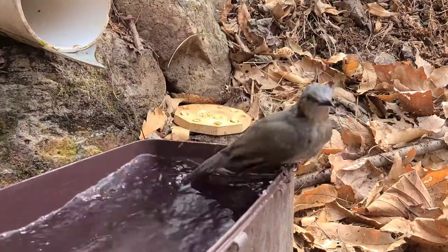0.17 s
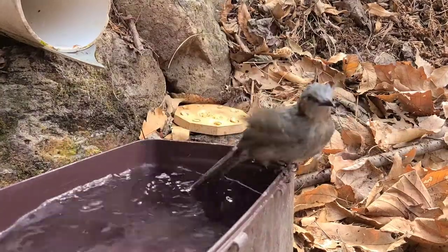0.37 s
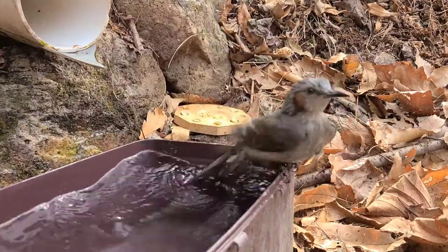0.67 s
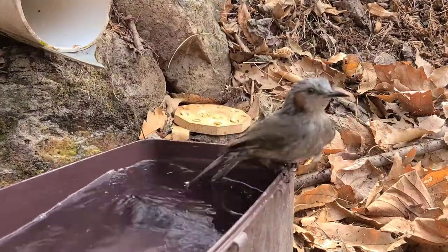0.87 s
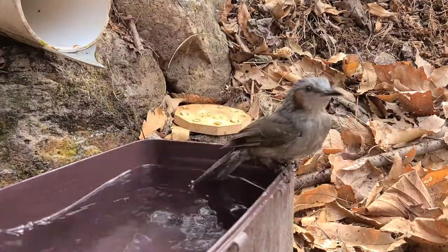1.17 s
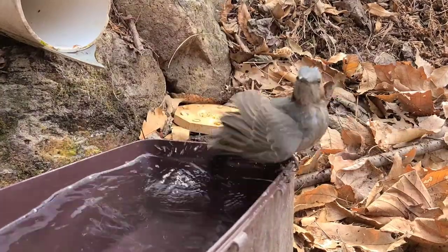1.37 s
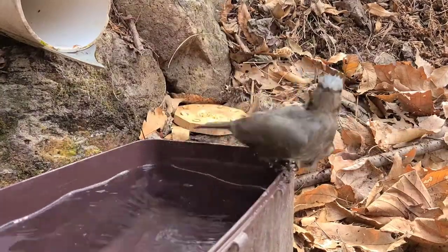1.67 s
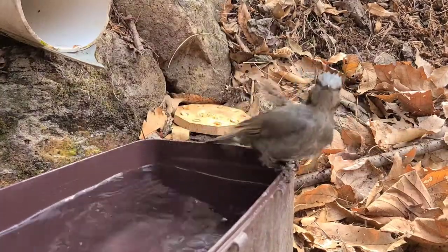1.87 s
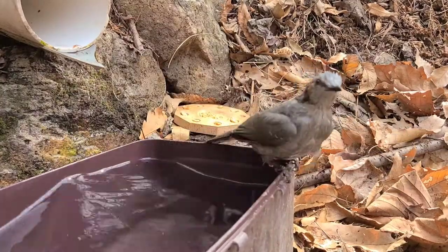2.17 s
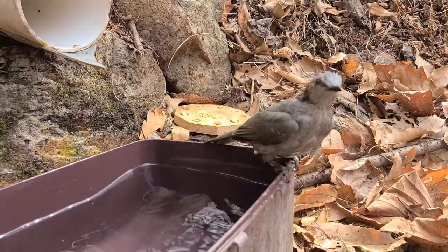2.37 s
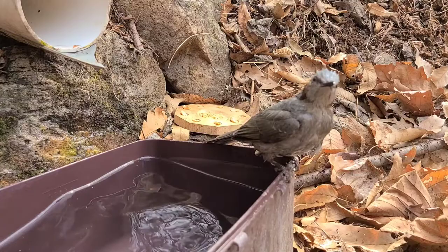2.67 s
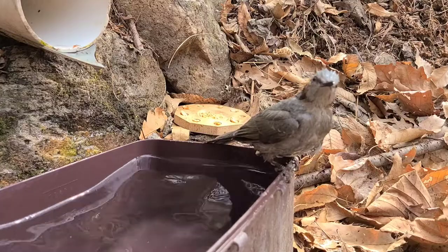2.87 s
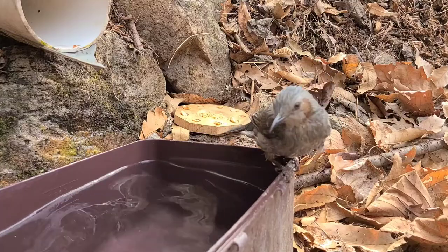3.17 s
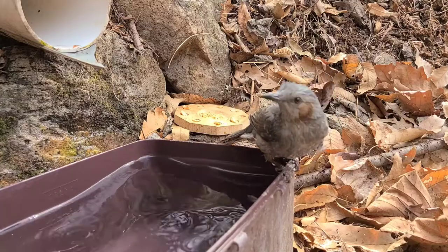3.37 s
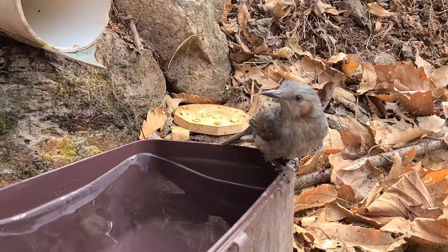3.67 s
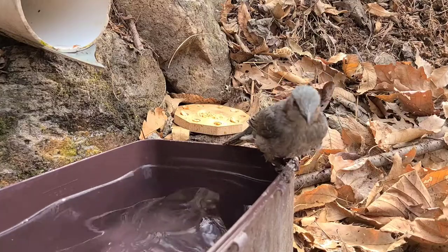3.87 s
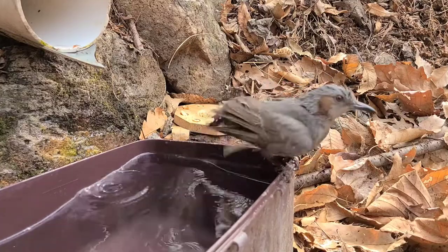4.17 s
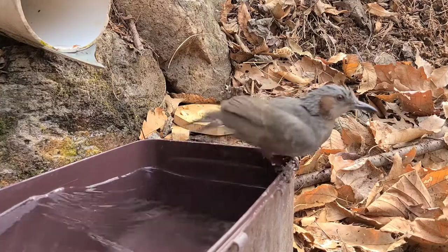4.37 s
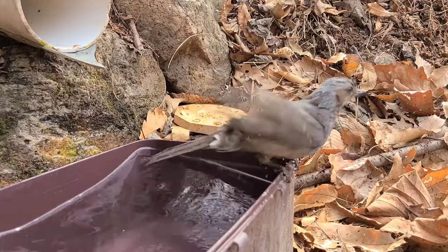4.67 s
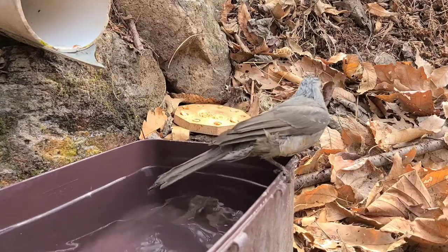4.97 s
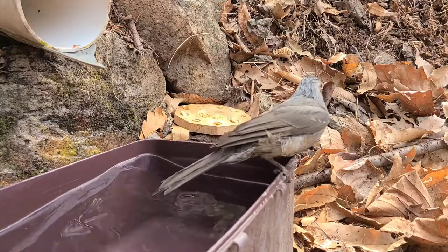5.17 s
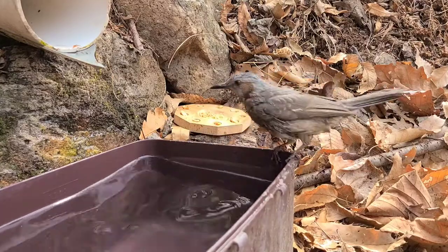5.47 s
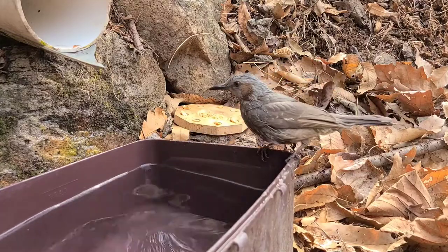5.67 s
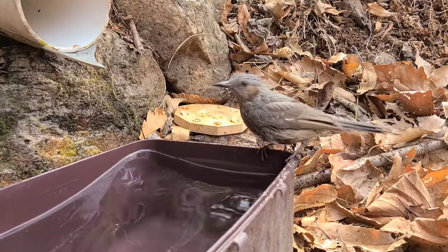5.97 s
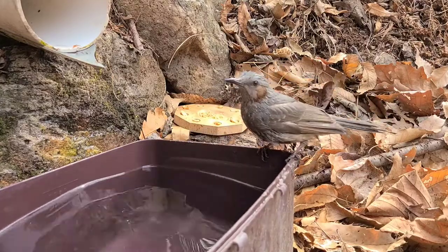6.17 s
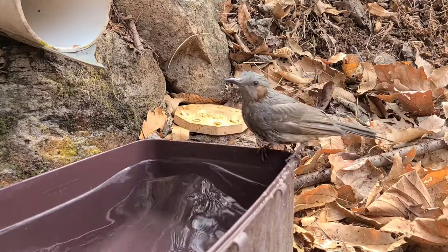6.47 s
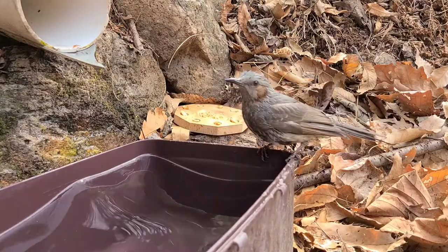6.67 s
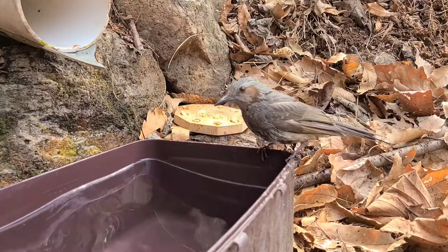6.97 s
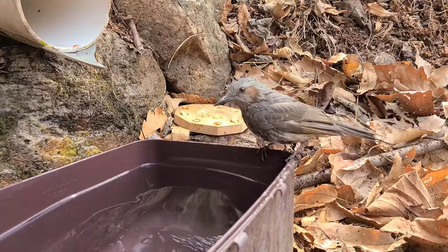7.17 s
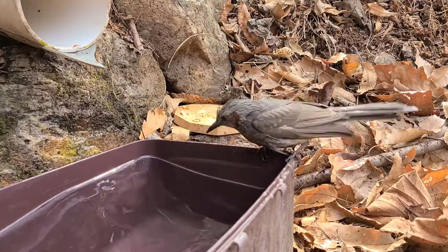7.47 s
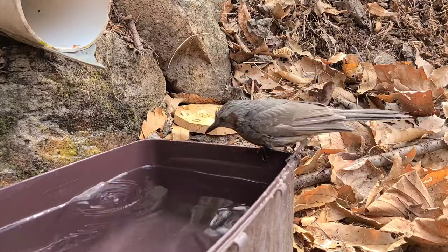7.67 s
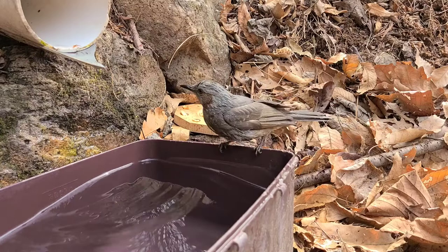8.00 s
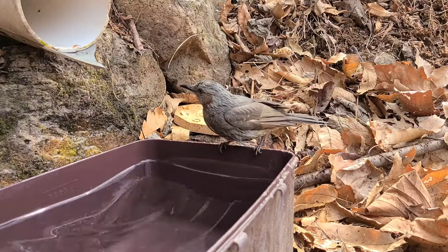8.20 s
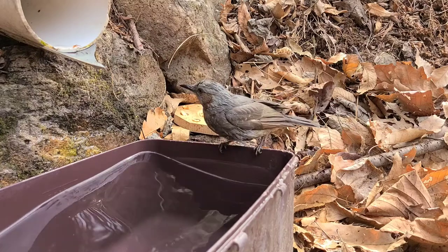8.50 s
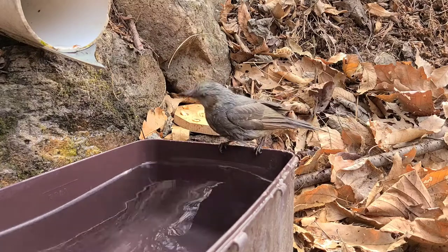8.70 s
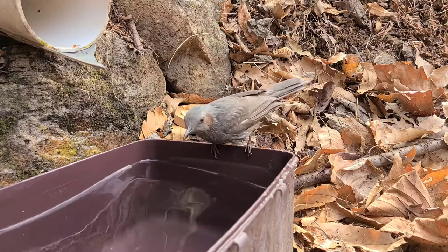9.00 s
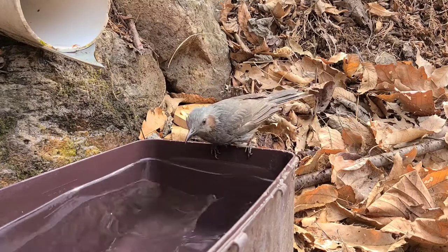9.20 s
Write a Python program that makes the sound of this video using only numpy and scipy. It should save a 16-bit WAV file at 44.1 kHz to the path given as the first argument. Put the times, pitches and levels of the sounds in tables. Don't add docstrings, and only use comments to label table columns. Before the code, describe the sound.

Crisp feather flutters, a plastic knock and watery plinks from a bathing bird, with thin bird calls and late scolding over low distant rumble.

```python
import sys
import numpy as np
from scipy import signal
from scipy.fft import rfft, irfft, next_fast_len
from scipy.io import wavfile
from scipy.ndimage import uniform_filter1d

SR = 44100
rng = np.random.default_rng(int(sys.argv[2]) if len(sys.argv) > 2 else 0)


def voltage_ratio(level):
    return 10 ** (np.asarray(level, float) / 20)


def dump_mix(stems):
    frames = np.atleast_2d(stems).T
    limited = np.clip(frames, -1, 1)
    pcm = np.round(limited * 32767).astype(np.int16)
    wavfile.write(sys.argv[1], SR, pcm)


N = 411894
M = next_fast_len(N)

# time in seconds, feather hiss, vane rustle, air
# moved in dB.
WING_STROKES = [(0.0463, -47.5, -47, -52), (0.346, -49.5, -51, -50), (0.4045, -48, -48.5, -51.5),
                (.4623, -50, -52.5, -53.5), (0.5217, -45, -48, -48.5), (0.5764, -48, -48, -51),
                (.627, -45.5, -47, -51), (0.676, -43, -48, -52.5), (0.697, -47.5, -49.5, -57),
                (0.7505, -47.5, -50, -50.5), (0.7973, -48, -49.5, -47.5), (0.8557, -48, -50, -53),
                (0.9405, -55.5, -55.5, -51), (1.391, -69, -77, -49.5), (1.486, -42, -50.5, -52.5),
                (1.531, -56, -54, -58), (1.584, -51, -52.5, -49.5), (1.6444, -43.5, -44, -46),
                (1.6978, -41, -45, -49.5), (1.7467, -44, -45.5, -47.5), (1.7984, -45, -50, -51),
                (1.851, -46.5, -45.5, -45), (1.902, -43, -45.5, -44.5), (1.9584, -45.5, -44, -43),
                (2.0162, -40, -46.5, -42.5), (2.0687, -41.5, -44, -43.5), (2.1295, -45.5, -48.5, -46),
                (2.193, -51, -52, -48.5),
                (4.118, -46, -47, -52), (4.5358, -45, -45.5, -49), (4.594, -41, -42.5, -44.5),
                (4.6433, -48, -50.5, -56), (4.7158, -43.5, -44.5, -42.5), (4.767, -44.5, -44.5, -48),
                (4.8343, -46, -45, -48), (7.894, -53.5, -54, -65), (8.8684, -65, -55, -59),
                (8.8877, -53, -50, -60), (8.9268, -51, -54, -62)]
STROKES = WING_STROKES


def noise(spectrum, channels):
    hz, db = np.transpose(spectrum)
    log_hz = np.log(np.arange(1, M // 2 + 2) * SR / M)
    gain = voltage_ratio(np.interp(log_hz, np.log(hz), db, -200, -200))
    x = irfft(rfft(rng.standard_normal((channels, M))) * gain, M)[:, :N]
    return x / x.std()


def pair(spectrum, alike):
    share = np.sqrt(np.clip([[1 + alike], [1 - alike]], 0, 2) / 2)
    mid, side = noise(spectrum, channels=2) * share
    return np.array([mid + side, mid - side])


def walk(rate_hz):
    hold = max(int(SR / rate_hz), 60)
    steps = rng.standard_normal(N // hold + 2)
    x = uniform_filter1d(np.repeat(steps, hold), hold)[:N]
    return x / x.std()


def add(out, start_s, sound):
    i = int(start_s * SR)
    out[..., i:i + sound.shape[-1]] += sound[..., :max(N - i, 0)]


def tone(out, rows, orders=((1, 0),), fade_s=0.00083):
    s, hz, db = np.transpose(rows)
    t = np.arange(s[0], s[-1], 1 / SR)
    phase = 2 * np.pi * np.cumsum(np.interp(t, s, hz)) / SR
    partials = sum(voltage_ratio(order_db) * np.sin(k * phase) for k, order_db in orders)
    ends = np.clip(np.minimum(t - s[0], s[-1] - t) / fade_s, 0, 1)
    add(out, s[0], np.sqrt(2) * voltage_ratio(np.interp(t, s, db)) * ends * partials)


def echoes(x, t60_s, wet_db, lag):
    t = np.arange(int(0.6 * SR)) / SR
    tail = rng.standard_normal((2, len(t))) * np.exp(-np.log(1000) * t / t60_s)
    tail *= voltage_ratio(wet_db) / np.sqrt(np.sum(tail ** 2, axis=1, keepdims=True))
    return np.array([x, np.roll(x, lag)]) + signal.fftconvolve(x[None], tail, axes=1)[:, :N]


def tilt(left_db):
    return voltage_ratio(np.array([[left_db], [-left_db]]))


def woodland(level_db=-44.5):
    # frequency in Hz, level in dB # per
    # Hz.
    air_colour = [(20, -12), (32, -18), (48, 0.5), (70, -0.5), (110, -12.5), (165, -26), (250, -32.5),
                  (400, -30.5),
                  (800, -35), (1600, -38), (3000, -44.5), (5000, -52.5), (6800, -55.5), (7600, -50),
                (8800, -58.5), (16300, -61)]
    # time in seconds, level in dB.
    rumble = [(0, -49), (.6, -46), (1.2, -48), (1.8, -45), (2.4, -47.5), (3, -42.5), (3.6, -43),
              (4.2, -44.5), (4.8, -46.5), (5.4, -43), (6, -43.5), (6.6, -44.5), (7.2, -42), (7.8, -46),
              (8.4, -44), (9, -46), (9.34, -41)]
    s, db = np.transpose(rumble)
    swell = voltage_ratio(np.interp(np.arange(N) / SR, s, db + 45))
    octave = np.log2(np.arange(1, M // 2 + 2) * SR / M / 60)
    alike = np.interp(octave, [0, 1, 2.3, 3.4, 4.5], [0.87, 0.87, 0.56, 0.22, 0])
    air = rfft(noise(air_colour, channels=2), M) * np.sqrt([1 + alike, 1 - alike])
    out = 0
    for k in range(-2, 9):
        band = irfft(air * np.clip(1 - np.abs(octave - k), 0, 1), M)[:, :N]
        flicker_db = 0.93 * walk(6) + (2.3 * walk(25) if k > 3 else 0)
        out = out + band * voltage_ratio(flicker_db) * (swell if k < 1 else 1)
    mid, side = out
    return voltage_ratio(level_db) * np.array([mid + side, mid - side]) / mid.std()


def far_birds(flick_db=-13, whistle_bend=0.0446):
    # start in seconds, upstroke length in seconds, top in Hz, upstroke and ending levels in dB.
    calls = [(0.24, 0.14, 7130, -62, -62), (0.709, 0.12, 6900, -60, -64), (1.004, 0.12, 7270, -52.5, -58.5),
             (3.113, 0.14, 7150, -60, -58), (3.489, 0.14, 7520, -58.5, -63.5),
             (6.212, 0.12, 6930, -59.5, -61.5), (6.521, .135, 7600, -56, -58.5),
             (6.877, 0.12, 7080, -54, -60.5), (8.731, 0.117, 7020, -59, -60), (9.053, 0.11, 6740, -59, -61)]
    # delay in seconds, held pitch in Hz.
    endings = [(0.0049, 3700), (0.0032, 3700), (0.0084, 3350), (0.0033, 3450), (.003, 3250), (0.0016, 3420),
               (0.00041, 3600), (.007, 3330), (.003, 3450), (.046, 3400)]
    upstroke = [(0, 0), (.12, 0.3), (.25, 0.59), (.45, .8), (.7, .91), (1, 0.99)]
    # pitch in Hz, level in dB.
    loudness = [(2300, -8), (3000, -2.5), (4300, 3), (5100, 9), (5700, -3.5), (6400, -10.5), (7200, -5),
                (8000, -9)]
    # time from upstroke end in seconds, pitch in Hz, level in dB.
    plunge = [(-.004, 6536, 0.5), (.003, 4510, 7), (.012, 2473, 5.5), (.018, 2280, -4), (.031, 2390, -6.5)]
    # time from upstroke end in seconds, pitch in Hz, level in dB.
    hold = [(.012, 3500, -20), (0.018, 3390, 7), (.031, 3343, 5.5), (.036, 2955, 8), (.043, 2250, -6)]
    # start in seconds, length in seconds, first and last pitch in Hz, level in dB.
    whistles = [(0.017, 0.15, 2730, 2410, -63), (.29, 0.13, 2380, 2300, -65),
                (6.153, 0.029, 6410, 6140, -70), (7.05, 0.024, 2200, 3300, -55),
                (7.072, 0.029, 2900, 2900, -59), (7.7, 0.051, 1700, 1800, -64),
                (6.63, 0.14, 2200, 2150, -65), (6.835, 0.165, 1900, 2260, -60.5),
                (.535, 0.095, 2200, 2120, -64), (9.8, .04, 1400, 1300, -57), (12, 0.054, 2280, 2220, -70),
                (5.908, 0.028, 6300, 6000, -67)]
    rises, ends = np.zeros(N), np.zeros(N)
    share, climb = np.transpose(upstroke)
    loud_hz, loud_db = np.transpose(loudness)
    u = np.linspace(0, 1, num=24)
    for (s, length_s, top_hz, up_db, end_db), (delay_s, held_hz) in zip(calls, endings):
        hz = 2300 + (top_hz - 2300) * np.interp(u, share, climb)
        db = up_db + np.interp(hz, loud_hz, loud_db) - 400 * np.maximum(length_s * u - 0.12, 0)
        tone(rises, np.transpose([s + length_s * u, hz, db]))
        tone(rises, [(s - 0.003, 4600, up_db + flick_db), (s + 0.013, 5900, up_db + flick_db)])
        for voice in (plunge, hold):
            scale = (1, held_hz / hold[1][1], 1)
            tone(ends, np.array(voice) * scale + (s + length_s + delay_s, 0, end_db))
    out = rises * voltage_ratio(3.5 * walk(300) + 2.5 * walk(90)) + ends * voltage_ratio(3.0 * walk(350))
    for s, length_s, first_hz, last_hz, db in whistles:
        bend = 1 + whistle_bend * np.sign(last_hz - first_hz)
        middle_hz = (first_hz + last_hz) / 2 * bend
        tone(out, [(s, first_hz, db - 5.5), (s + length_s / 2, middle_hz, db),
                   (s + 0.816 * length_s, last_hz, db), (s + length_s, (middle_hz + first_hz) / 2, db - 12)])
    out = out + voltage_ratio(-8) * np.roll(out, int(0.007 * SR))
    return echoes(out, t60_s=0.12, wet_db=-2, lag=-15) * voltage_ratio(-6)


def scolds(length_s=0.0224, wobble=0.052, buzz_db=4.0, trim_db=-10.0):
    # start in seconds, peak in dB, fourth partial in Hz, slant as a share of pitch.
    notes_heard = [(7.9717, -60, 3700, 0.12), (8.099, -64, 4500, 0.14), (8.371, -43, 3910, 0.35),
                   (8.512, -54, 3900, -0.21), (8.54, -52.5, 3200, -0.22), (8.597, -52.5, 4000, 0.2),
                   (8.671, -41.5, 3870, -0.21), (9.4, -51, 2900, 0.11), (8.64, -68, 4500, .05),
                   (8.689, -57, 2900, 0.083), (8.806, -62, 4500, -0.049), (8.822, -64, 4800, -0.11),
                   (8.752, -57, 4410, .1), (8.612, -71, 3800, 0.042), (8.912, -48, 3700, -0.14),
                   (8.708, -55, 4400, 0.12), (8.737, -56, 4800, -0.13), (8.765, -52, 6200, 0.071),
                   (8.7894, -63, 4500, 0.1), (9.3244, -60, 4000, 0.094)]
    # multiple of pitch, level in dB.
    orders = [(2, -4.5), (3, 5), (4, -3), (5, -23), (6, -21), (7, -23)]
    out = np.zeros(N)
    u = np.linspace(0, 1, num=16)
    for s, db, fourth_hz, slant in notes_heard:
        waver = wobble * rng.standard_normal(len(u))
        pitch_hz = fourth_hz / 4 * (1 + slant * (u - 0.5) + waver)
        tone(out, np.transpose([s + length_s * u, pitch_hz, db + trim_db - 10 * (u - 0.4) ** 2]), orders)
    return echoes(out * voltage_ratio(buzz_db * walk(500)), t60_s=0.52, wet_db=-5, lag=10)


def water(cycles=10.6, glide=0.246, trim_db=-2.5, spray_db=-11.5, lap_db=-62.5):
    # time in seconds, peak in dB, pitch in Hz.
    drops = [(0.941, -62, 460), (1.003, -48, 512), (1.325, -47, 700), (8.897, -49, 547), (2.347, -51, 710),
             (2.415, -51, 686), (2.713, -55, 740), (3.213, -49.5, 820), (3.35, -51, 700), (3.996, -53, 570),
             (5.062, -52, 840), (6.528, -70, 875), (6.592, -56, 766), (6.771, -47, 562), (7.045, -49, 706),
             (7.107, -49, 963), (7.259, -52, 814), (7.445, -50, 850), (7.777, -60, 562),
             (7.893, -53.5, 399), (8.079, -47, 572), (8.37, -49.5, 740), (8.873, -59, 835),
             (9.08, -51, 1040), (9.234, -51, 760), (9.305, -43, 686)]
    # time in seconds, peak in dB, pitch in Hz.
    plinks = [(5.689, -46.5, 1400), (1.314, -45.5, 1360), (3.073, -51, 3700), (3.7, -42, 2900),
              (5.218, -38, 3880), (7.602, -35, 1930), (7.612, -46, 2200), (7.7772, -47, 1456),
              (8.9228, -40, 1560), (8.9994, -41, 2210), (9.062, -42, 1540)]
    # time in seconds, peak in dB, pitch in Hz.
    trickle = [(2.487, -55, 641), (2.596, -61, 603), (2.636, -65, 524), (2.693, -52, 1400),
               (2.838, -53, 825), (2.945, -65, 799), (3.046, -54, 700), (3.186, -56, 736),
               (3.435, -65, 610), (3.516, -63, 743), (3.721, -56, 690), (3.759, -55, 724),
               (3.916, -58, 563), (5.095, -53, 743), (5.156, -55, 589), (5.329, -60, 754),
               (5.469, -55, 726), (5.536, -54, 845), (5.878, -56, 586), (5.926, -53, 735),
               (6.267, -62, 584), (6.317, -54, 732), (6.616, -51, 747), (6.809, -47.5, 1050),
               (6.921, -57, 550), (7.081, -53, 720), (7.419, -52.5, 734), (7.565, -54, 859),
               (7.841, -59, 583), (8.002, -55, 743), (8.35, -51, 870), (8.547, -53, 844), (8.681, -54, 890),
               (8.851, -49, 708), (9.106, -49, 840)]
    hollows_hz = (583, 740, 850, 1040)
    spray = []
    for s, _, rustle_db, _ in STROKES:
        for a, b, c in rng.random((8, 3)):
            spray.append((s + 0.05 * a, rustle_db + spray_db - 3.3 * np.log(b + 0.43), 500 * 6 ** c))
    lapping = []
    for wave in rng.random((120, 6, 3)):
        wave_s, detune = wave[0, 0] * N / SR, 1 + 0.087 * (wave[0, 2] - 0.5)
        for a, b, c in wave[1:]:
            hz = hollows_hz[int(4 * c)] * detune
            lapping.append((wave_s + 0.09 * a, lap_db - 3.7 * np.log(b + 0.1), hz))
    out = np.zeros(N)
    for rows, ring in ((drops, cycles), (plinks, 7.0), (trickle, 9.0), (spray, 5.0), (lapping, 7.0)):
        for s, db, hz in rows:
            life_s = ring / hz
            t = np.arange(int(6 * life_s * SR)) / SR
            climb_s = glide * life_s * (np.exp(-t / life_s) + t / life_s) * min(1000 / hz, 1)
            phase = 2 * np.pi * hz * (t + climb_s - 0.061 * t)
            shape = (1 - np.exp(-t / 0.0015)) * np.exp(-t / life_s)
            add(out, s, voltage_ratio(db + trim_db) * np.sin(phase) * shape)
    return echoes(out, t60_s=0.12, wet_db=-1.5, lag=2)


def squeaks():
    # time in seconds, pitch in Hz, level in dB.
    squeak_notes = [
        [(5.168, 1430, -74), (5.18, 1286, -68.5), (5.2, 1250, -85)],
        [(5.972, 1470, -82), (5.985, 1400, -80.5), (6.002, 1250, -80)],
        [(5.384, 1820, -76), (5.392, 1996, -58), (5.43, 1927, -49), (5.443, 1950, -52), (5.452, 1807, -46),
         (5.466, 1740, -47), (5.474, 1750, -69)],
    ]
    # multiple of pitch, level in dB.
    squeak_orders = [(1, -10), (2, 8), (3, -28), (4, -2.5), (5, -25)]
    # time in seconds, pitch in Hz, level in dB.
    chuckles = [
        [(2.795, 373, -80), (2.82, 364, -79), (2.845, 330, -82)],
        [(2.862, 344, -76), (2.9, 402, -79)],
    ]
    # multiple of pitch, level in dB.
    chuckle_orders = [(4, 8.5), (5, 4), (6, 0), (7, -3), (8, -1)]
    # time in seconds, pitch in Hz, level in dB.
    peeps = [
        [(2.695, 673, -77), (2.725, 713, -68)],
        [(2.728, 885, -67), (2.756, 840, -75)],
    ]
    # multiple of pitch, level in dB.
    peep_orders = [(2, 3.5), (3, -3), (4, -6)]
    clear, throaty = np.zeros(N), np.zeros(N)
    for rows in squeak_notes:
        tone(clear, rows, squeak_orders)
    tone(clear, [(5.372, 1150, -61), (5.382, 1300, -59), (5.387, 1960, -52)])
    for rows in chuckles:
        tone(throaty, rows, chuckle_orders)
    for rows in peeps:
        tone(throaty, rows, peep_orders)
    voice = clear * voltage_ratio(2.8 * walk(120)) + throaty * voltage_ratio(4.4 * walk(500))
    return echoes(voice, t60_s=0.12, wet_db=-10.0, lag=-2) * tilt(1.5)


def knock(push_s=0.00041):
    # frequency in Hz, level in dB, t60 in seconds.
    modes = [(134, -16, 0.018), (440, -4.5, 0.0089), (700, -1.5, 0.0061), (1050, 0, 0.0048),
             (1600, -3, 0.0021), (2250, -5.5, 0.008), (2900, -9.5, 0.0094), (3500, -20, 0.011),
             (4840, -43, 0.0055)]
    # time in seconds, level in dB.
    taps = [
        (1.4456, -21),
        (1.4462, -13),
    ]
    out, t = np.zeros(N), np.arange(int(0.08 * SR)) / SR
    rim = 0
    for hz, db, t60_s in modes:
        rim = rim + voltage_ratio(db) * np.cos(2 * np.pi * hz * t) * np.exp(-np.log(1000) * t / t60_s)
    rim = -rim * (1 - np.exp(-t / push_s))
    for s, db in taps:
        add(out, s, voltage_ratio(db) * rim / np.abs(rim).max())
    wall_push = -voltage_ratio(-13) * np.sin(np.pi * np.clip(t / 0.0013, 0, 1)) ** 1.5
    wing_slap = voltage_ratio(-33.5) * rng.standard_normal(len(t)) * np.exp(-t / 0.0087)
    add(out, taps[0][0], wall_push + wing_slap)
    return echoes(out, t60_s=0.03, wet_db=-18, lag=2) * tilt(1.2)


def snaps(click_s=0.00029, cycles=2.4, ring_db=-3, trim_db=-5):
    # time in seconds, peak in dB, ring in Hz.
    quills = [(0.0493, -41, 2600), (0.1125, -31, 2900), (0.5244, -36, 1210), (0.5736, -29, 4080),
              (0.628, -37, 1170), (0.6769, -32, 3690), (0.7517, -36, 1610), (0.8545, -40, 3380),
              (1.394, -33, 1150), (1.6866, -39, 1880), (1.6993, -30, 1160), (1.8005, -28, 2430),
              (1.8135, -22.5, 3200), (1.7045, -30, 2500), (1.8525, -31, 2050), (1.9044, -35, 1030),
              (1.955, -31, 1900), (2.0153, -40, 1060), (2.067, -42, 3060), (2.0714, -42, 1110),
              (2.1914, -44, 1070), (4.0806, -44, 2930), (4.118, -38, 1230), (8.6, -48, 2740),
              (8.613, -49, 3500), (8.54, -50, 3000), (8.738, -52, 3800), (8.693, -48, 2500),
              (4.122, -27, 1620), (4.1627, -42, 1000), (4.1992, -32, 1700), (4.244, -45, 1350),
              (4.2857, -34, 1230), (4.3318, -27, 3550), (4.375, -41, 2770), (4.374, -35, 2350),
              (4.4227, -32.5, 1500), (4.5353, -33, 1220), (4.588, -31, 3340), (4.596, -43, 1050),
              (4.7167, -40, 1200), (4.7204, -40, 1190), (4.766, -44, 1110), (4.8274, -40, 4190),
              (4.8987, -39, 1530), (5.2205, -44, 3910)]
    out, t = np.zeros(N), np.arange(int(0.015 * SR)) / SR
    for s, db, hz in quills:
        tick = rng.standard_normal(len(t)) * np.exp(-t / click_s) / 2
        ring = voltage_ratio(ring_db) * np.sin(2 * np.pi * hz * t) * np.exp(-t * hz / cycles)
        add(out, s, voltage_ratio(db + trim_db) * (tick + ring))
    return echoes(out, t60_s=0.03, wet_db=0, lag=1) * tilt(1.1)


def wings(beat_s=0.019, flick_s=0.0043, lag_s=0.0026, crackle_db=2.5, patch_db=3.5,
          trim_db=(-6.5, -4.0, -2.0, 0.5), whirr_rise_s=0.024, whirr_fall_s=0.028):
    # frequency in Hz, level in dB per Hz.
    hiss = [(2500, -26), (4000, -0.5), (6000, 1.5), (10000, -1.5), (13000, 0), (16500, -1)]
    # frequency in Hz, level in dB per Hz.
    rustle = [(500, -18), (1000, 0), (2000, -3.5), (3500, -3), (5000, -12), (8000, -21)]
    # frequency in Hz, level in dB per Hz.
    puff = [(170, -48), (260, -0.5), (450, -2.5), (800, -6.5), (1400, -20)]
    # frequency in Hz, level in dB per Hz.
    thump = [(80, -17), (120, 4.5), (170, 0), (230, -25)]
    # time in seconds, feather hiss in dB, vane rustle in dB.
    flicks = [(0.1146, -51, -50.5), (0.168, -48, -49), (0.1883, -45.5, -54), (0.2216, -55, -54),
              (0.277, -54, -52.5), (.3032, -48, -54), (1.8108, -60, -49), (4.0266, -57, -63),
              (4.081, -56, -49), (4.163, -40, -46.5), (4.2005, -33.5, -42), (4.246, -40.5, -47.5),
              (4.2866, -34, -43), (4.3311, -38, -43), (4.375, -31, -35), (4.3894, -45, -59),
              (4.423, -42.5, -46), (4.485, -70, -53.5), (4.545, -55, -57), (4.661, -45, -49),
              (4.8135, -49, -58), (4.8997, -47, -49.5), (4.914, -37.5, -64), (4.9332, -60, -65),
              (4.038, -57, -56), (4.05, -60, -51), (4.139, -43, -50), (4.7825, -47, -60), (4.845, -50, -53)]
    # time in seconds, hiss in dB, rustle in dB.
    claws = [(1.3166, -71, -55), (1.433, -47.5, -53), (1.445, -33.5, -31.5), (2.7811, -59, -66),
             (3.046, -59, -72), (4.9738, -64, -74), (5.102, -62, -68), (5.067, -60, -53),
             (5.1253, -59, -69), (5.218, -68, -55.5), (5.3876, -61, -55.5), (5.425, -43, -62),
             (5.453, -36, -51), (5.477, -45, -53.5), (5.4914, -54, -73.5), (5.463, -44, -60),
             (5.626, -64, -58), (5.5653, -74.5, -58.5), (5.6144, -54, -59), (5.6396, -50.5, -66),
             (5.72, -62, -64), (6.038, -59, -76), (1.453, -52, -44), (1.4925, -53, -54), (1.539, -60, -56),
             (7.83, -50, -76), (7.8494, -56, -74), (7.8846, -63, -51)]
    crackle = voltage_ratio(crackle_db * walk(450))
    crackle /= np.sqrt(np.mean(crackle ** 2))
    layers = [crackle * voltage_ratio(1.6 * walk(900)) * pair(hiss, alike=0.0) * tilt(1.5),
              crackle * pair(rustle, alike=0.22) * tilt(1.2),
              pair(puff, alike=0.87) * tilt(0.8),
              pair(thump, alike=1.0) * tilt(1.0)]
    events = [(s, True, (hiss_db, rustle_db, air_db, air_db)) for s, hiss_db, rustle_db, air_db in STROKES]
    for s, hiss_db, rustle_db in flicks + claws:
        events.append((s, False, (hiss_db, rustle_db, rustle_db - 1.5, rustle_db - 8.5)))
    t = np.arange(int(0.1 * SR)) / SR
    octaves = np.log2(np.arange(1, len(t) // 2 + 2) * SR / len(t) / 300)
    out, whirr = np.zeros((2, N)), np.zeros((2, N))
    for s, is_beat, levels_db in events:
        length_s, rise, fall_power, lead = (beat_s, 0.45, 2.1, 0.45) if is_beat else (flick_s, 0.15, 1.2, 0.27)
        start_s = s - lead * length_s
        for k, db in enumerate(levels_db):
            span_s = length_s + k * lag_s
            shape = (1 - np.exp(-(t / (rise * span_s)) ** 2)) * np.exp(-(t / span_s) ** fall_power)
            burst = layers[k][:, int(start_s * SR):][:, :len(t)]
            if k < 2:
                bumps = np.interp(octaves, np.linspace(0, 6, num=16), rng.standard_normal(16))
                burst = irfft(rfft(burst) * voltage_ratio(patch_db * bumps), len(t))
            burst = burst * shape
            energy = np.mean(np.sum(burst ** 2, axis=1)) + 1e-30
            level = np.sqrt(np.sum(shape ** 2) / energy) / shape.max()
            add(out, start_s, burst * voltage_ratio(db + trim_db[k]) * level)
        whirr[:, int(s * SR)] += voltage_ratio(levels_db[:2]) ** 2 * length_s / beat_s
    around = np.arange(-0.2 * SR, 0.4 * SR) / SR
    halo = np.exp(-np.maximum(around / whirr_fall_s, -around / whirr_rise_s))
    whirr = signal.fftconvolve(whirr, halo[None], axes=1)[:, int(0.2 * SR):][:, :N]
    whirr = np.sqrt(np.abs(whirr))
    return out + voltage_ratio(-16.5) * whirr[0] * layers[0] + voltage_ratio(-15) * whirr[1] * layers[1]


def scene():
    return woodland() + far_birds() + scolds() + water() + squeaks() + knock() + snaps() + wings()


def top_cut(x):
    return signal.sosfilt(signal.butter(12, 15830, fs=SR, output="sos"), x)


def record(dry):
    low_pass = signal.ellip(14, 0.2, 90, 15800, fs=SR, output="sos")
    mix = signal.sosfilt(low_pass, dry)
    return top_cut(mix)


dry = scene()
out = record(dry)
dump_mix(out)
```